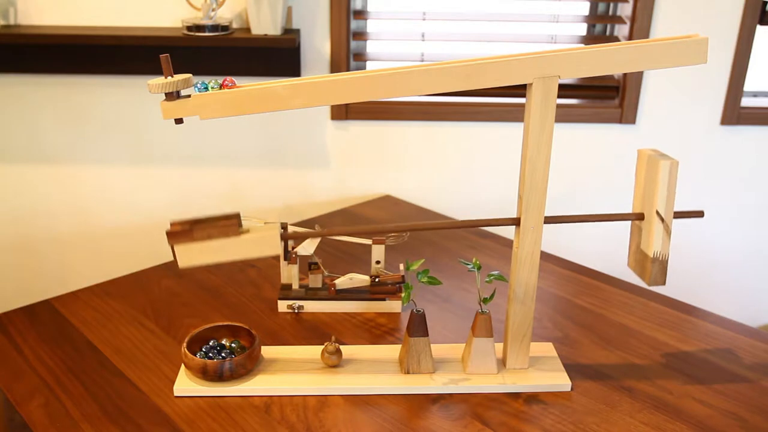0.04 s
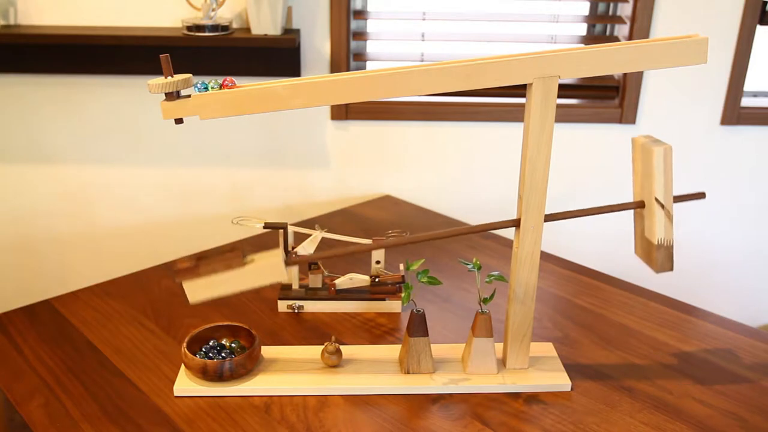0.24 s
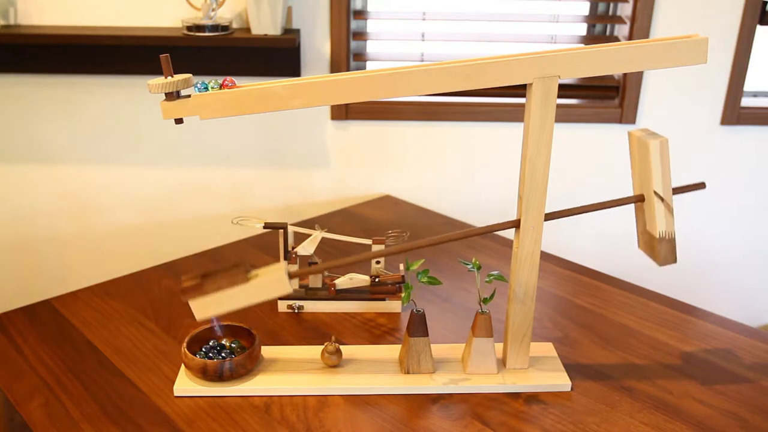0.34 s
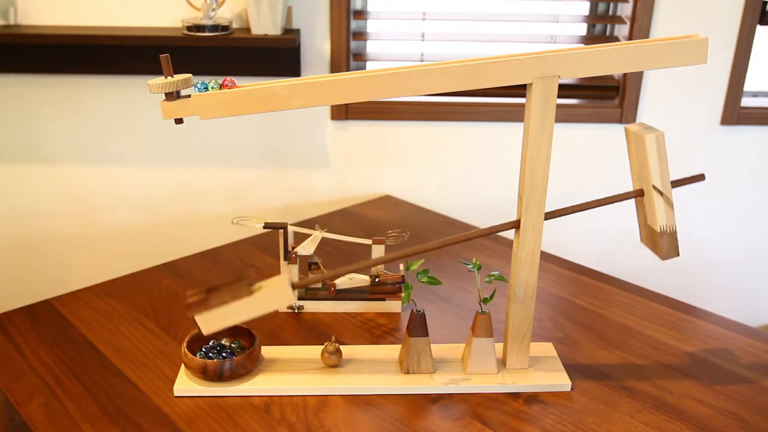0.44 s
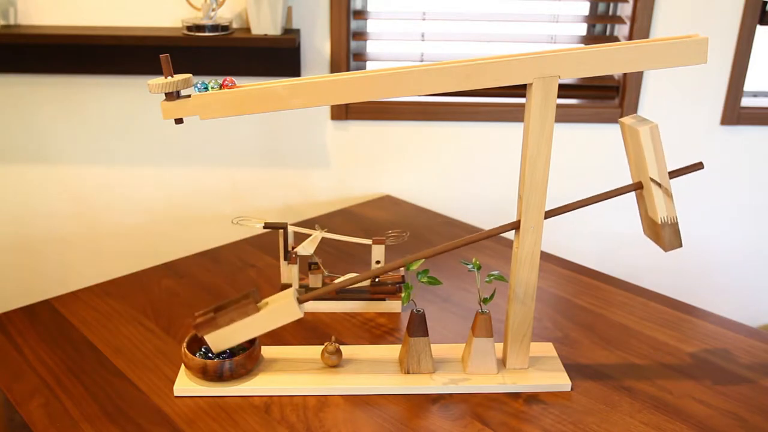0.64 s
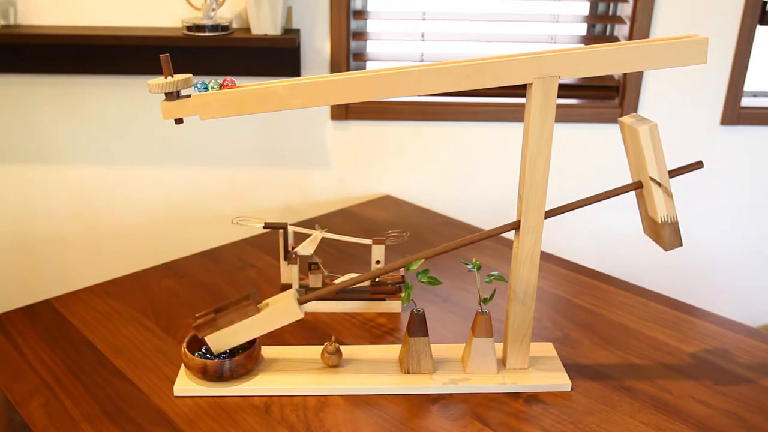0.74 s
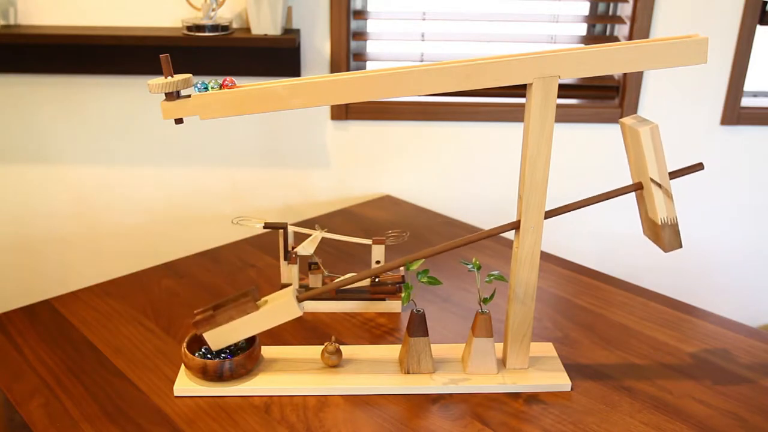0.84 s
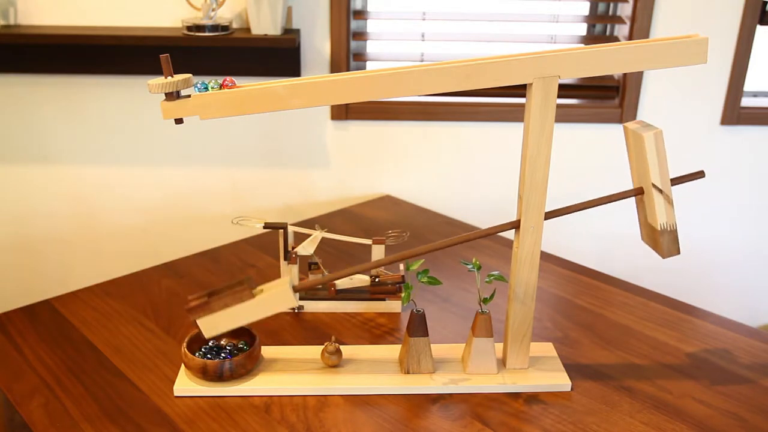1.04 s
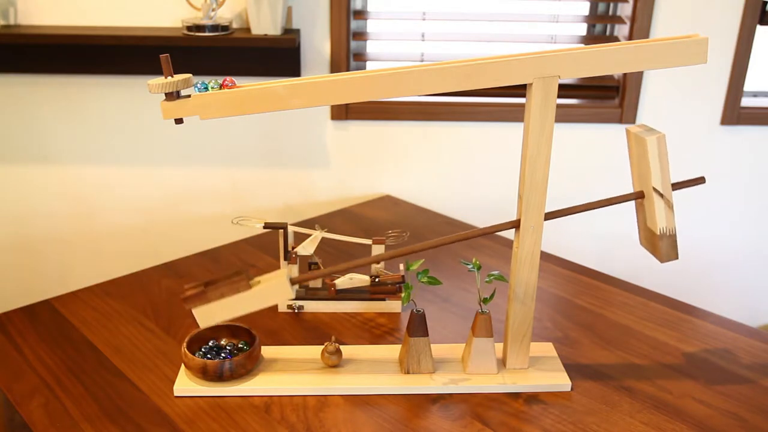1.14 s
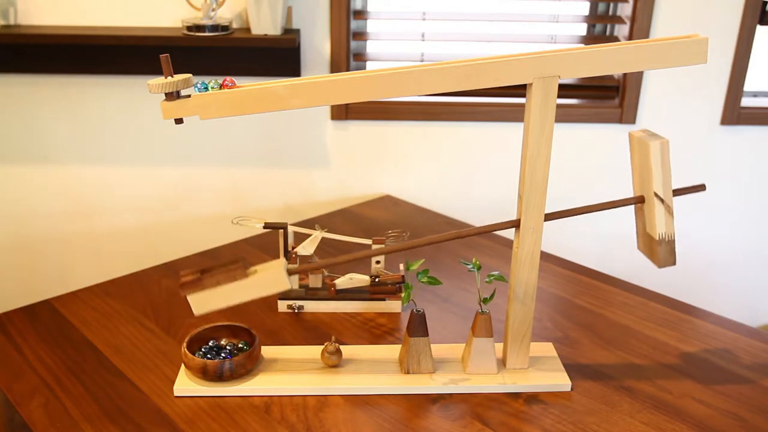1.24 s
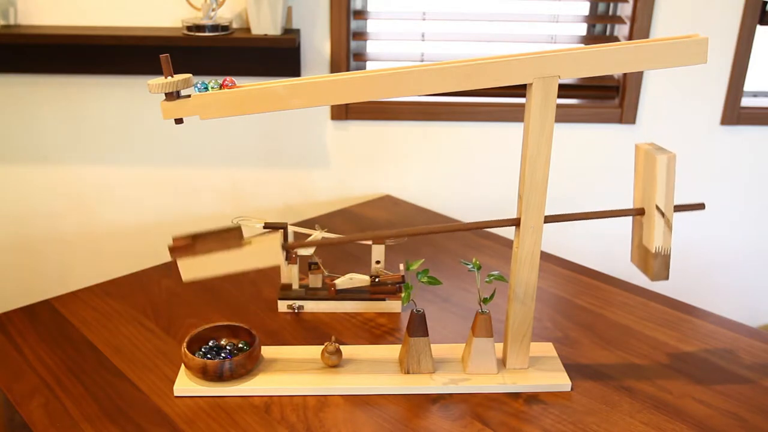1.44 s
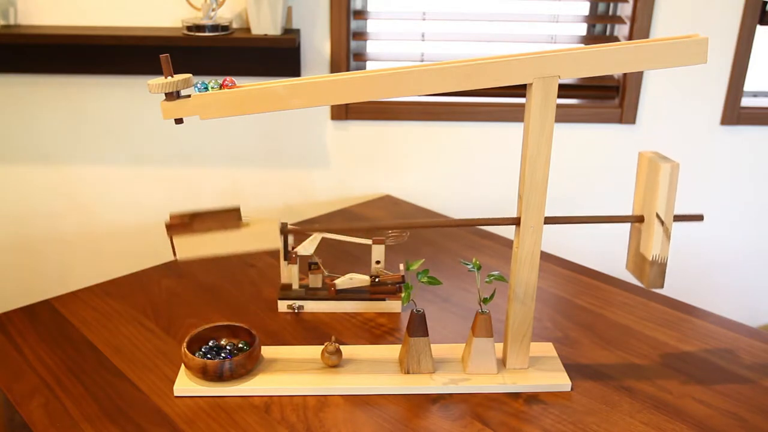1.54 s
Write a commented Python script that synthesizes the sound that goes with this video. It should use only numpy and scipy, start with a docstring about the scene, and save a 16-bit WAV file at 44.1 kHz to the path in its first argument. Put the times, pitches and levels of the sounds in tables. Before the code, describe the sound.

Marbles clack and bounce into a wooden bowl after a wooden arm knocks.

```python
"""A quiet, bare room with a wooden marble machine on a table. A marble rolls along the pivoting arm
and knocks against its end; the arm dips, marbles drop into a wooden bowl and bounce on the others
there, and the arm bumps at the bottom of its swing. The table top mirrors each clack, the room
rings on, and the hardest clacks overload the microphone."""
import sys
import numpy as np
from scipy import signal
from scipy.fft import rfft, irfft
from scipy.io import wavfile
from scipy.ndimage import map_coordinates

SR = 44100
rng = np.random.default_rng(int(sys.argv[2]) if len(sys.argv) > 2 else 0)


def persist_wave(psi):
    """Save psi, clipped to +-1, as 16-bit WAV."""
    counts = np.round(np.clip(psi, -1, 1) * 32767).astype(np.int16)
    wavfile.write(sys.argv[1], SR, np.atleast_2d(counts).T)


N = 70560
T, HZ = np.arange(N) / SR, np.fft.rfftfreq(N, 1 / SR)


def amp(db):
    """Decibels to gain."""
    return 10 ** (np.asarray(db) / 20)


def unit(x):
    """Scale to rms 1."""
    return x / np.sqrt(np.mean(x ** 2) + 1e-20)


def along(points, hz):
    """Read a curve of (frequency, value) points on a log axis."""
    f, v = np.transpose(points)
    return np.interp(np.log(hz + 1), np.log(f + 1), v)


def fade(t60, t=T):
    """Exponential decay, 60 dB down after t60 seconds."""
    return np.exp(-np.log(1000) * t / t60)


def rise(seconds):
    """Soft attack with this time constant."""
    return 1 - np.exp(-T / seconds)


def noise(spectrum):
    """Coloured noise of rms 1."""
    return unit(irfft(rfft(rng.standard_normal(N)) * amp(along(spectrum, HZ)), N))


def late(x, s):
    """x delayed by s seconds."""
    return np.pad(x, (round(s * SR), 0))[:N]


def ring(modes, scatter_db=1):
    """Damped modes of alternating polarity, their balance a little different at every call."""
    t = T[:N // 2]
    offsets_db = scatter_db * rng.standard_normal(len(modes))
    out = np.zeros(N)
    for k, (hz, db, t60) in enumerate(modes):
        out[:len(t)] += (-1) ** k * amp(db + offsets_db[k]) * fade(t60, t) * np.sin(2 * np.pi * hz * t)
    return out


# Air bed, weighted to the lows (f/Hz, level/dB)
AIR_EQ = [(15, -32), (25, -24), (107, -13), (221, -13), (253, -9), (305, -13.5), (433, -12), (469, -15),
          (598, -12), (648, -15), (1170, -14.5), (1380, -18.5), (1490, -20), (2360, -25.5), (15500, -37.5)]
# Faint steady tones in the room (f/Hz, level/dB)
HUM_TONES = [(250, -68), (440, -61)]
def room_tone(air_db=-52):
    """A soft bed of air noise with a faint hum."""
    hum = sum(amp(db) * unit(np.sin(2 * np.pi * hz * T)) for hz, db in HUM_TONES)
    return amp(air_db) * noise(AIR_EQ) + hum


# Reverb decay of the bare room (f/Hz, t60/s)
REVERB_DECAY = [(150, .36), (500, 0.25), (1300, 0.43), (3500, 0.42), (6500, 0.35), (10000, 0.4),
                (15000, 0.34)]
# Warm colour of the reverb (f/Hz, level/dB)
REVERB_EQ = [(150, 12), (600, 6.5), (1300, 2), (3000, -4), (6000, 0), (10000, -6), (15000, -10.5)]
def room(wet_db, early_db=-10.5):
    """The room's answer to a hit: early scatter and a diffuse tail."""
    hz, t, bands = signal.stft(rng.standard_normal(N), SR, nperseg=256)
    bands = bands * fade(along(REVERB_DECAY, hz)[:, None], t) * amp(along(REVERB_EQ, hz))[:, None]
    attack = rise(.0031)
    tail = signal.istft(bands, SR, nperseg=256)[1][:N] * attack
    early = noise(REVERB_EQ) * fade(t60=.035) * attack
    return (amp(wet_db) * unit(tail) + amp(early_db) * unit(early)) / np.sqrt(N)


# Fader curve of the rolling marble (t/s, level/dB)
ROLL_FADER = [(0, -39), (.09, -40), (.2, -45.5), (.38, -46.5), (.7, -40), (1.05, -72.5)]
# Hollow colour of the wooden track (f/Hz, level/dB)
TRACK_EQ = [(59, -37), (100, -11.5), (231, -5.5), (443, -6.5), (492, -9), (546, -4.5), (923, -3.5),
            (1020, 1.5), (1110, -6), (1590, -3.5), (2000, -5), (4840, -12), (15000, -41)]
def rolling(bumps_per_s=360, rough_db=3):
    """A marble rumbles over the grain of the wooden track."""
    grain = map_coordinates(rng.standard_normal(N // 10), [T * bumps_per_s])
    level_db = np.interp(T, *np.transpose(ROLL_FADER)) - rough_db * grain
    return noise(TRACK_EQ) * amp(level_db)


# Modes of the frame on the table (f/Hz, level/dB, t60/s)
FRAME_MODES = [(127.3, -6.5, .18), (137.3, 0, 0.42), (225.7, -14, 0.16), (285.3, -12, 0.17),
               (366.6, -2, 0.11), (405.5, -2.5, 0.41), (955, -8, 0.75), (1148, -15.5, .45)]
def frame_thud():
    """The shaken frame swells into a slow, low ring."""
    return ring(FRAME_MODES) * rise(.005)


# Dull colour of the arm's bump (f/Hz, level/dB)
BUMP_EQ = [(50, -37), (140, -2), (260, 0.5), (700, -11), (1400, 6), (2600, -19), (5000, -30)]
def arm_bump():
    """A short rumble as the arm bottoms out."""
    rumble = noise(BUMP_EQ) * rise(.0036) * fade(t60=.15)
    return amp(-27) * late(rumble, s=.696)


def contact():
    """The transient of two hard surfaces meeting: a brief, evenly bright burst of unit energy."""
    envelope = (rise(.00019) * fade(t60=.0075))[:1024]
    burst = rng.standard_normal(len(envelope)) * envelope
    for _ in range(4):  # flatten the spectrum, then tighten the decay again
        burst = irfft(np.exp(1j * np.angle(rfft(burst)))) * envelope ** .25
    return np.pad(burst / np.linalg.norm(burst), (0, N - len(burst)))


def minimum_phase(gain):
    """The tightest impulse that has this spectrum."""
    cepstrum = irfft(np.log(np.maximum(gain, 1e-6)), N)
    fold = 1 + np.sign(N / 2 - np.arange(N)) * (T > 0)
    return irfft(np.exp(rfft(cepstrum * fold)), N)[:N // 8]


def resonance(centre_hz, width_hz):
    """Power response of one resonance."""
    return (HZ * width_hz) ** 2 / ((HZ * width_hz) ** 2 + (HZ ** 2 - centre_hz ** 2) ** 2)


def timbre(modes, crack, body_db, edge_db, body_hz=1600, edge_hz=7600, top_hz=11760):
    """Resonances over a broad crack; the point and hardness of contact shift body and edge."""
    power = amp(along(crack, HZ)) ** 2 + sum(amp(db) ** 2 * resonance(f, w) for f, w, db in modes)
    power /= 1 + (HZ / top_hz) ** 16
    low_shelf = 1 / (1 + (HZ / body_hz) ** 4)
    high_shelf = 1 - 1 / (1 + (HZ / edge_hz) ** 10)
    return np.sqrt(power) * amp(body_db * low_shelf + edge_db * high_shelf)


# Reflections off the table and nearby surfaces (delay/s, level/dB)
REFLECTIONS = [(.0042, -9.5), (.0054, -15), (0.0113, -16.5), (0.015, -21)]
def blow(gain, wet_db):
    """One hit: a contact, its reflections and the reverb, coloured by the struck object's spectrum."""
    direct = contact()
    reflected = sum(amp(db) * late(direct, s) for s, db in REFLECTIONS)
    return signal.fftconvolve(direct + reflected + room(wet_db), minimum_phase(gain))[:N]


# Woody resonances of the arm (f/Hz, width/Hz, level/dB)
ARM_MODES = [(880, 110, -2), (1605, 120, 3), (1782, 100, -0.5), (1887, 120, 3), (2330, 210, 5),
             (2813, 170, 6), (3547, 75, 8.5), (4380, 120, -4), (5684, 240, -14.5), (6400, 260, -8),
             (9880, 560, -14), (11060, 560, -13.5)]
# Crack of wood on wood (f/Hz, level/dB)
WOOD_CRACK = [(50, -39.5), (200, -20), (600, -14), (2800, 0), (4500, -26.5), (12000, -30), (15500, -33)]
# Thin ring of a small metal part (f/Hz, level/dB, t60/s)
WIRE_MODES = [(4500, -5, .25), (6400, -3.5, .2), (9700, -5, 0.21), (10300, -6.5, .22), (13300, -18, .2)]
# Cues for the knocks in the arm (t/s, level/dB, edge/dB, frame thud/dB, wire ring/dB)
KNOCK_CUES = [(.2195, 4, -19, -43.5, -61.5), (0.2255, 14.5, -4.5, -29.5, -36),
              (0.2444, 5.5, 5, -48.5, -45.5), (0.7011, -10, 20, -39.5, -67.5)]
def arm_knocks():
    """Knocks in the wooden arm, each layered with the frame's thud and a thin metal ring."""
    out = np.zeros(N)
    for s, db, edge_db, thud_db, wire_db in KNOCK_CUES:
        knock = blow(timbre(ARM_MODES, WOOD_CRACK, 0, edge_db), wet_db=-3.5)
        out += late(amp(db) * knock + amp(thud_db) * frame_thud() + amp(wire_db) * ring(WIRE_MODES), s)
    return out


# Resonances of the bowl full of marbles (f/Hz, width/Hz, level/dB)
BOWL_MODES = [(1078, 120, -1.5), (1592, 100, 0), (2264, 570, 2.5), (2410, 190, -1.5), (3035, 100, 3.5),
              (3550, 260, 1), (4510, 350, 0.5), (5150, 240, -12), (6190, 720, -2.5), (7200, 330, -14.5),
              (7950, 210, -3.5), (10280, 500, -15.5), (10450, 700, -11), (12300, 1300, -6)]
# Crack of glass on glass (f/Hz, level/dB)
GLASS_CRACK = [(50, -40), (300, -16), (700, -17), (1200, -6.5), (3000, -4.5), (9000, -10), (12500, -12),
               (15500, -6)]
def bowl(body_db, edge_db, low_cut_hz=700):
    """Spectrum of a marble striking the full bowl, which is too small to radiate much bass."""
    low_cut = HZ ** 2 / np.hypot(HZ ** 2, low_cut_hz ** 2)
    return timbre(BOWL_MODES, GLASS_CRACK, body_db, edge_db) * low_cut


def jostle(count=8, from_s=.57, to_s=.69):
    """Faint, roomy ticks as the disturbed marbles nudge each other."""
    tick = blow(bowl(0, 0), wet_db=8)
    out = np.zeros(N)
    for k, (when, softness) in enumerate(rng.random((count, 2))):
        s = from_s + (to_s - from_s) * (k + when) / count
        out += amp(-10.5 - 4 * softness) * late(tick, s)
    return out


# Cues for the marbles landing in the bowl (t/s, level/dB, body/dB, edge/dB, reverb tail/dB,
# then f/Hz, boost/dB for each of the two resonances struck hardest)
LANDING_CUES = [(0.3986, 24, -15, 4.5, -3.5, 2510, 3.5, 5850, 4),
                (0.5099, 14, -0.5, 4.5, -3, 1205, 14, 8400, 10),
                (0.5592, 12, 2, 7, -0.5, 2030, 2.5, 4900, 11.5), (0.6011, 7, 4, 5, -4, 1640, 9, 4390, 10),
                (.6066, 4, -1, 3, 0.5, 3940, 1, 4620, 12), (0.6355, 3.5, 0, 3, 4.5, 3070, -12, 4920, 11),
                (0.6728, -1.5, 10.5, 9, -1, 2550, 9, 4750, 11),
                (0.6947, -1, 14.5, 0.5, -5, 1030, 4, 2470, 9),
                (0.7947, 17.5, -2, 3.5, -5.5, 2320, 4, 7050, 11),
                (0.8048, 8.5, 0, -17, -3, 1570, 3, 3286, 3), (.8439, 7, 1, -11, 0, 1464, 8, 2550, 7),
                (0.8696, 3.5, 2.5, -1.5, -3, 2500, 8, 12000, 5),
                (0.8887, 2, -2, -14, 1.5, 1540, 0, 2440, 1.5), (0.899, -2.5, 1, -19, -6, 1480, -2, 2350, 9),
                (0.967, -15, -16, 0, -5, 2390, -11, 9560, 15.5)]
def marbles(relative_width=.084, thump_db_per_db=1.77):
    """Each landing cracks against glass, rings the bowl and shakes the frame; the hardest also thump."""
    shake = amp(-65.5) * frame_thud()
    thump = ring([(860, -6.5, .0052)])  # dry, low thump of the overloaded microphone
    hardest_db = max(cue[1] for cue in LANDING_CUES)
    out = np.zeros(N)
    for s, db, body_db, edge_db, wet_db, *struck in LANDING_CUES:
        boost_db = sum(d * resonance(f, relative_width * f) for f, d in zip(struck[::2], struck[1::2]))
        clack = blow(bowl(body_db, edge_db) * amp(boost_db), wet_db) + shake
        thump_db = thump_db_per_db * (db - hardest_db)  # light bounces hardly overload the microphone
        out += late(amp(db) * clack + amp(thump_db) * thump, s)
    return out


def scene():
    """The machine in its room, in mono."""
    return (marbles() + jostle() + arm_knocks() + arm_bump() + rolling() + room_tone())[None]


def record(dry):
    """The microphone soft-clips the hardest peaks, sooner on one side, and cuts the very top end."""
    headroom, lopsided, top_hz = 1.25, .071, 15700
    ceiling = headroom * (1 + lopsided * np.sign(dry))
    clipped = dry / (1 + np.abs(dry / ceiling) ** 8) ** (1 / 8)
    return signal.sosfilt(signal.ellip(10, .1, 80, top_hz, fs=SR, output="sos"), clipped)


dry = scene()
out = record(dry)
persist_wave(out)
```